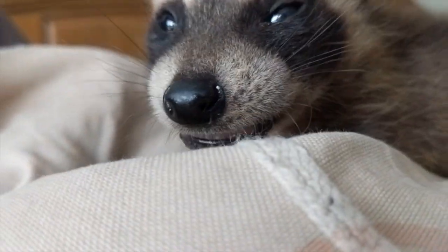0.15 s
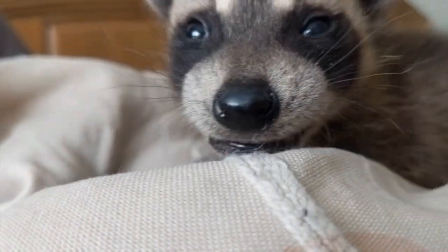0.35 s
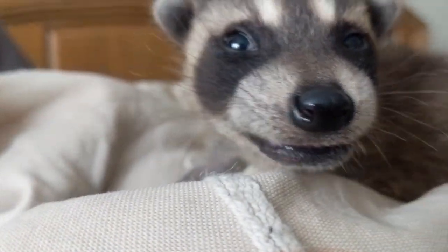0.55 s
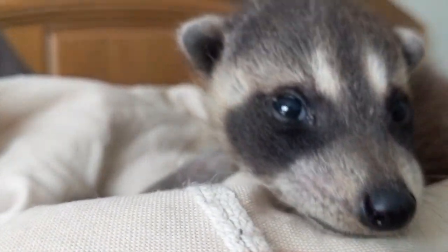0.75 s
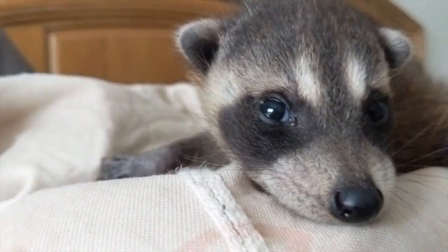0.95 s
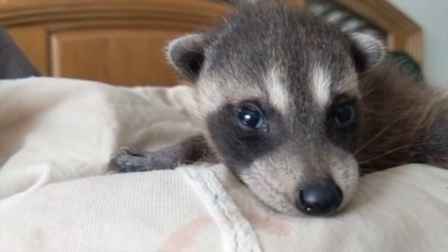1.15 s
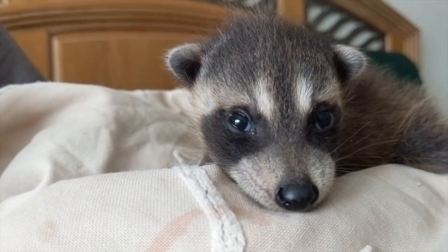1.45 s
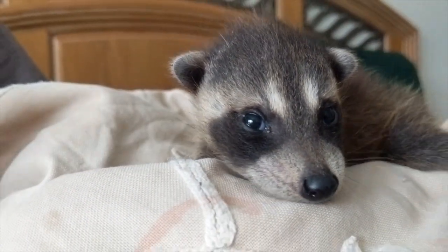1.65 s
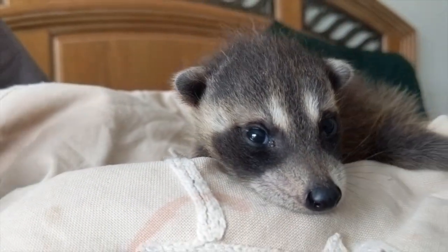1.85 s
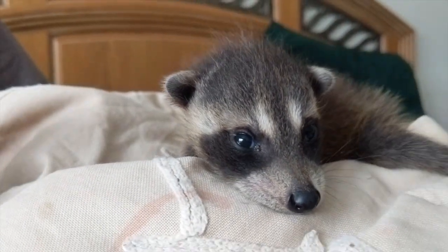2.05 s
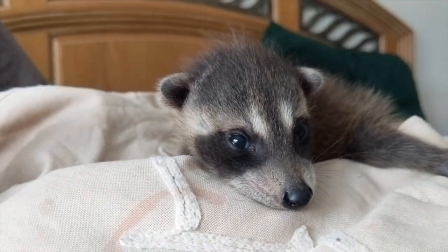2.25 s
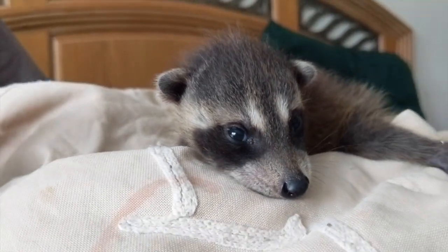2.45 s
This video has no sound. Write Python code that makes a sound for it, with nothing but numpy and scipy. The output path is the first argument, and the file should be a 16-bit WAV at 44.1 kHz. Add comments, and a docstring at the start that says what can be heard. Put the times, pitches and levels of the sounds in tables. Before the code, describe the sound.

Close up on a bed, a baby raccoon chitters three times, each bout of thin chirps and tiny grunts opening with a mouth click. The first is brightest; the later two are muffled, with soft bedding bumps and faint room hiss.

```python
"""A baby raccoon chitters close by on a bed, over the faint hiss and hum of a dry room.
Its mouth clicks open for a loud, bright first bout: thin raspy whines climb into sharp chirps,
whose pitch collapses in a puff of rasp, with small throat grunts among them.
After a pause come soft bumps on the bedding, another click and a duller bout, mouth nearly shut.
A third bout, also dull, follows just after two seconds, with a click and a few more bumps."""
import sys
import numpy as np
from scipy import signal
from scipy.fft import rfft, irfft, next_fast_len
from scipy.io import wavfile
from scipy.ndimage import map_coordinates

SR = 44100
rng = np.random.default_rng(int(sys.argv[2]) if len(sys.argv) > 2 else 0)


def master(y):
    """Save y as 16-bit WAV."""
    cut = np.clip(np.atleast_2d(y).T, -1, 1)
    pcm = np.round(cut * 32767)  # scale
    wavfile.write(sys.argv[1], SR, pcm.astype(np.int16))


N = 114660
TOP_HZ = 15900  # the highest sound kept
RASP_PULSING = 1.2  # how strongly the rasp pulses with each cycle of the voice

# How the throat shapes a whine's overtones: frequency_hz, gain_db
WHINE_THROAT = [(1600, -0.5), (2400, -2.5), (3200, -1.5), (4100, -7), (5200, -20), (7600, -14.5),
                (9000, -30), (11000, -34), (14000, -30)]
# The whines: start_s, length_s, first_pitch_hz, last_pitch_hz, first_level_db, last_level_db, rasp_db
WHINES = [ (0.193, 0.0152, 806, 1070, -53.5, -37.5, -65.5), (0.207, 0.0094, 1124, 1250, -40.5, -41, -63),
          (.248, .038, 940, 1100, -57, -48, -53), (0.335, 0.014, 883, 1010, -59, -50, -52),
          (.353, .011, 1040, 1130, -48, -47, -53), (0.413, 0.028, 896, 1070, -59.5, -46.5, -50),
          (0.434, 0.017, 1006, 1306, -53.5, -43.5, -47), (0.494, 0.045, 834.4, 1172, -60, -50, -50.5),
          (0.58, .019, 1090, 805, -63, -60.5, -50), (0.595, 0.018, 820, 1090, -62.5, -53, -52),
          (0.614, 0.021, 1570, 1624, -66, -62, -59.5), (.680, .021, 1020, 860, -54, -57, -52),
          (0.705, 0.0189, 883, 1113, -65, -50.5, -55.5), (1.341, .020, 810, 970, -62, -50, -70),
          (1.418, .030, 780, 1030, -60, -48, -69), (1.497, .045, 879, 1085, -61, -49, -62.5),
          (1.538, 0.018, 1146, 1243, -43, -47.5, -64), (1.588, 0.033, 852.4, 651, -61, -65, -62),
          (1.621, 0.034, 978, 883, -55, -58.5, -68), (2.192, 0.025, 773, 1017, -67, -52.5, -65.5),
          (2.260, 0.025, 755, 674, -67, -66, -68), (2.289, 0.034, 857, 1190, -62, -43, -63.5),
          (2.354, 0.033, 969, 976, -65, -58.5, -67), (2.391, 0.031, 675, 1020, -61.5, -62, -69),
          (2.481, 0.035, 910, 802, -60.5, -66.5, -70)]


def whines():
    """Thin gliding tones, with a burst of rasp in every cycle; the rasp is strongest midway."""
    out, t = np.zeros(N), np.arange(-SR // 50, SR // 10) / SR
    for start, length, first_hz, last_hz, first_db, last_db, rasp_db in WHINES:
        progress = np.clip(t / length, 0, 1)
        outside_s = t - progress * length  # time before the start or past the end
        db = first_db + (last_db - first_db) * progress
        jitter = 0.025 * amp(0.6 * (-52 - db))  # a weak voice is less steady
        waver = np.exp(jitter * wobble(t, per_s=603) + 0.025 * wobble(t, per_s=68.6))
        pitch = (first_hz + (last_hz - first_hz) * progress) * waver
        phase = 2 * np.pi * np.cumsum(pitch) / SR
        level = amp(db + 0.7 * wobble(t, per_s=400)) * swell(outside_s, 0.0015)
        # Overtones are richer in a raspier whine, and grow toward its end.
        overtones_db = 0.64 * (rasp_db + 39.5) + 2 * (progress - 0.5)
        tone = np.sqrt(2) * (np.cos(phase) + amp(overtones_db) * overtones(phase, pitch, WHINE_THROAT))
        bursts = rng.standard_normal(len(t)) * np.exp(RASP_PULSING * np.cos(phase))
        rasp_level = amp(rasp_db - 3.5 * (2 * progress - 1) ** 2) * swell(outside_s, 0.0048)
        add(out, start + t[0], level * tone + rasp_level * rasp(bursts, start))
    return out


# How the throat shapes a chirp's middle overtones: frequency_hz, gain_db
CHIRP_THROAT = [(1200, 11), (2200, 1.5), (2900, 6), (3500, -4), (4400, -15), (6000, -26.5)]
# The same for its highest overtones: frequency_hz, gain_db
CHIRP_TREBLE = [(5500, -28), (7400, -61), (8700, 2.5), (10000, -7), (11800, -21.5), (15000, -49)]
# The chirps: peak_s, rise_s, top_pitch_hz, level_db, overtones_db, treble_db
CHIRPS = [ (0.2216, 0.01, 1220, -43.5, -8, -13), (0.3018, 0.0022, 1360, -43, 0.5, 3),
          (0.3816, 0.0014, 1460, -43, 4.5, 4.5), (.4630, 0.012, 1490, -43.5, 6.5, 8.5),
          (0.5494, 0.029, 1470, -44, 7, 8.5), (.6470, 0.0072, 1460, -43, 6.5, 6.5),
          (1.3819, 0.0005, 1300, -49.5, -10.5, -26), (1.4634, 0.0024, 1380, -46, -7.5, -25),
          (1.554, 0.0036, 1390, -43, -8.5, -23), (2.2249, 0.0016, 1270, -42.5, -10.5, -27.5),
          (2.3280, 0.0046, 1130, -49, -15.5, -27), (2.443, 0.0016, 1290, -45, -13.5, -18.5)]


def chirps():
    """Pitch and brightness climb to a peak, then the voice collapses into a puff of rasp."""
    climb_hz_per_s, collapse_s, collapse_share = 16000, 0.00442, 0.584
    ring_hz, ring_width_hz, ring_db = 2720, 290, 10  # a ringing note in the puff
    out, t = np.zeros(N), np.arange(-SR // 20, SR // 20) / SR
    before, after = np.minimum(t, 0), np.maximum(t, 0)
    for peak, rise, top_hz, db, overtones_db, treble_db in CHIRPS:
        climb = np.maximum(top_hz + climb_hz_per_s * before, top_hz / 2)
        collapse = 1 - collapse_share * (1 - swell(after, collapse_s))
        pitch = climb * collapse * (1 + 0.036 * wobble(t, per_s=702))
        phase = 2 * np.pi * np.cumsum(pitch) / SR
        middle = amp(overtones_db) * swell(t, 0.0063, 0.0058) * overtones(phase, pitch, CHIRP_THROAT)
        treble_level = amp(treble_db) * swell(t - 0.0011, 0.0037, 0.0027)
        treble = treble_level * overtones(phase, pitch, CHIRP_TREBLE)
        level = np.exp(-(before / rise) ** 4) * swell(after, 0.005)
        tone = np.sqrt(2) * level * (np.cos(phase) + middle + treble)
        bursts = rng.standard_normal(len(t)) * np.exp(RASP_PULSING * np.cos(phase))
        bursts = filtered(bursts, lambda hz: amp(ring_db * swell(hz - ring_hz, ring_width_hz)))
        puff = rasp(bursts, peak) * swell(t - 0.0013, 0.0012, 0.0093)
        puff_db = -5.5 + (overtones_db + treble_db) / 2  # a brighter chirp has a louder puff
        add(out, peak + t[0], amp(db) * (tone + amp(puff_db) * puff))
    return out


def overtones(phase, pitch, throat):
    """Tones at 2 to 15 times the pitch; the throat sets their strength and shifts their waves."""
    shifts = rng.uniform(0, 2 * np.pi, 16)
    return sum(colour(throat, k * pitch) * (k * pitch < TOP_HZ) * np.cos(k * phase + shifts[k])
               for k in range(2, 16))


# How the open mouth shapes the rasp: frequency_hz, gain_db
OPEN_MOUTH = [(400, -11), (900, -2.5), (1600, -10.5), (2600, -1.5), (4300, -2), (5400, -16), (7600, -20.5),
              (8600, -2), (10200, -6.5), (12300, -6.5), (15000, -34)]
# How the nearly shut mouth shapes it: frequency_hz, gain_db
NEARLY_SHUT_MOUTH = [(400, 0.5), (1100, 8), (1700, 3.5), (2500, 1), (5000, -13), (6300, -3), (8600, -15.5),
                     (10700, -4.5), (16000, -20)]
# The mouth's highest ring, which rises in the first bout: time_s, frequency_hz
MOUTH_RING = [(.25, 9400), (.55, 11600)]


def rasp(noise, time_s):
    """Rushing air shaped by the mouth: open for the first bout, nearly shut afterwards."""
    open_until_s, ring_db, ring_width_hz = 1, 9, 650
    if time_s > open_until_s:
        return unit(filtered(noise, lambda hz: colour(NEARLY_SHUT_MOUTH, hz)))
    ring_hz = np.interp(time_s, *np.transpose(MOUTH_RING))
    return unit(filtered(
        noise, lambda hz: colour(OPEN_MOUTH, hz) * amp(ring_db * swell(hz - ring_hz, ring_width_hz))))


# The mouth clicks: start_s, level_db
CLICKS = [(.1620, -36), (1.3151, -37), (2.1600, -46)]


def mouth_clicks():
    """A moist click with a wisp of hiss as the mouth opens for each bout."""
    out, t = np.zeros(N), np.arange(-SR // 50, SR // 50) / SR
    for start, db in CLICKS:
        add(out, start, amp(db) * knock(hz=1160, fade_s=0.0042, attack_s=0.00015))
        hiss = swell(t, 0.0025, 0.00125) * rasp(rng.standard_normal(len(t)), start)
        add(out, start + t[0], amp(db - 27) * hiss)
    return out


# The grunts: start_s, level_db
GRUNTS = [(0.21, -48.5), (0.2915, -44), (.370, -51), (1.370, -45), (1.4505, -44), (2.221, -48.5),
          (2.315, -49.5), (2.433, -47.5)]


def throat_grunts():
    """Short, low, hissy pulses from the throat, each at a slightly different pitch."""
    out, t = np.zeros(N), np.arange(-SR // 50, SR // 50) / SR
    for start, db in GRUNTS:
        hz = 385 * np.exp(0.068 * rng.standard_normal())
        add(out, start, amp(db) * knock(hz, fade_s=0.028, attack_s=0.00013))
        hiss = swell(t, 0.0041, 0.0082) * rasp(rng.standard_normal(len(t)), start)
        add(out, start + t[0], amp(db - 15.5) * hiss)
    return out


# The bumps: start_s, level_db, pitch_hz
BUMPS = [(1.19, -45, 123), (1.2183, -41, 127), (2.161, -47, 142), (2.190, -46.5, 158), (2.446, -44, 61),
         (2.533, -48, 94)]


def bedding_bumps():
    """Soft dull knocks on the bedding: a low thud plus a higher, shorter tap."""
    out = np.zeros(N)
    for start, db, hz in BUMPS:
        thud = knock(hz, fade_s=0.045, attack_s=0.00032)
        tap = amp(0.5) * knock(1.58 * hz, fade_s=0.012, attack_s=0.00035)
        add(out, start, amp(db) * (thud + tap))
    return out


def room_echo(x):
    """The short, weak echo of a furnished bedroom."""
    echo_db, fade_s = -30, 0.12
    t = np.arange(SR // 3) / SR
    tail = rng.standard_normal(len(t)) * amp(-60 * t / fade_s) * (1 - np.exp(-t / 0.012))
    tail = filtered(tail, lambda hz: colour([(3000, 1.5), (12000, -19)], hz))
    return amp(echo_db) * signal.fftconvolve(x, tail / np.linalg.norm(tail))[:N]


# The room's steady noise, from low rumble to high hiss: frequency_hz, gain_db
ROOM_NOISE = [(25, -16.5), (60, 1.5), (200, -10), (500, -18), (1500, -24.5), (6000, -33), (15800, -41.5)]


def room_noise():
    """Room rumble, hiss and a faint hum."""
    noise_db, hum_db, hum_hz = -66, -76.5, 112.8
    noise = unit(filtered(rng.standard_normal(N), lambda hz: colour(ROOM_NOISE, hz)))
    hum = np.sqrt(2) * np.sin(2 * np.pi * hum_hz * np.arange(N) / SR)
    return amp(noise_db) * noise + amp(hum_db) * hum


def knock(hz, fade_s, attack_s):
    """One ringing note that dies away by 60 dB in fade_s."""
    t = np.arange(SR // 5) / SR
    return np.sin(2 * np.pi * hz * t) * amp(-60 * t / fade_s) * (1 - np.exp(-t / attack_s))


def amp(db):
    """Turn decibels into a gain, the number to multiply a sound by."""
    return 10 ** (np.asarray(db) / 20)


def unit(x):
    """Scale a sound to an average strength (rms) of 1."""
    return x / np.sqrt(np.mean(x ** 2) + 1e-20)


def colour(points, hz):
    """The gain at hz, read from a curve through (frequency_hz, gain_db) points."""
    points_hz, db = np.transpose(points)
    return amp(np.interp(np.log(hz + 1), np.log(points_hz), db))


def filtered(x, gain):
    """Turn each frequency in x up or down by gain(hz)."""
    size = next_fast_len(2 * len(x))
    return irfft(rfft(x, size) * gain(np.fft.rfftfreq(size, 1 / SR)), size)[:len(x)]


def wobble(t, per_s):
    """A smooth curve through per_s random values a second."""
    return map_coordinates(rng.standard_normal(SR // 100), [(t - t[0]) * per_s], mode="mirror")


def swell(x, rise, fall=None):
    """A bell shape around zero, rise wide before it and fall wide after (the same if left out)."""
    return np.exp(-(x / np.where(x < 0, rise, fall or rise)) ** 2)


def add(out, start, x):
    """Mix x into out from the start time on."""
    part = out[round(start * SR):][:len(x)]
    part += x[:len(part)]


def scene():
    """The animal and its bed in the room."""
    near = whines() + chirps() + mouth_clicks() + throat_grunts() + bedding_bumps()
    return (near + room_echo(near) + room_noise())[None]


def record(dry):
    """The recorder drops the deepest bass and everything above TOP_HZ."""
    bass_cut = [(20, -41.5), (45, -0.5)]  # frequency_hz, gain_db
    return np.array([filtered(x, lambda hz: colour(bass_cut, hz) * (hz < TOP_HZ)) for x in dry])


dry = scene()
out = record(dry)
master(out)
```